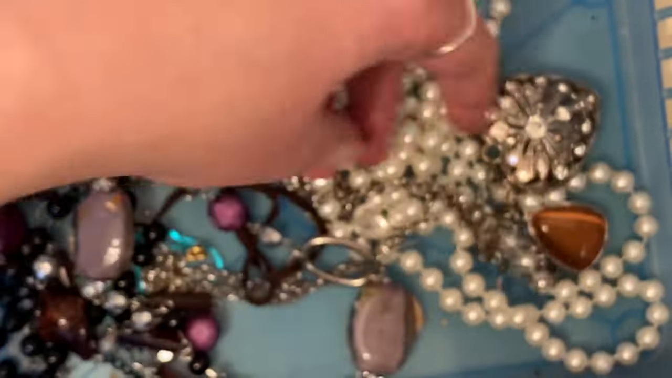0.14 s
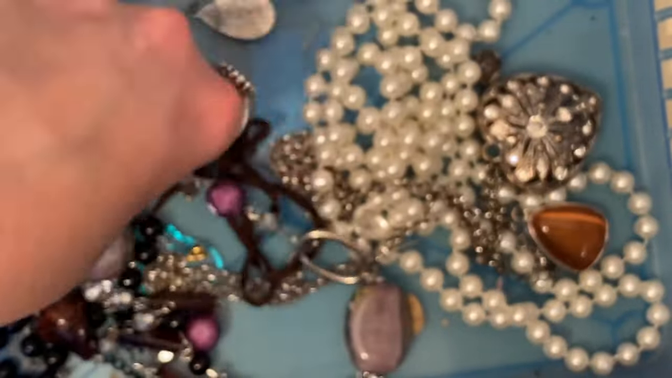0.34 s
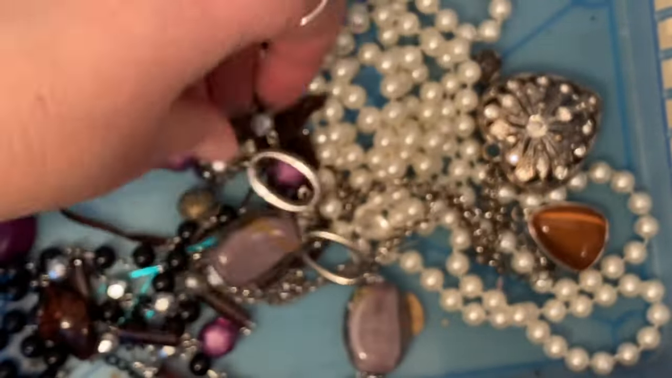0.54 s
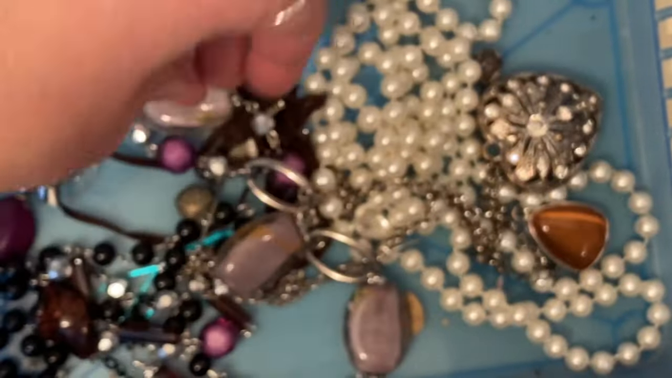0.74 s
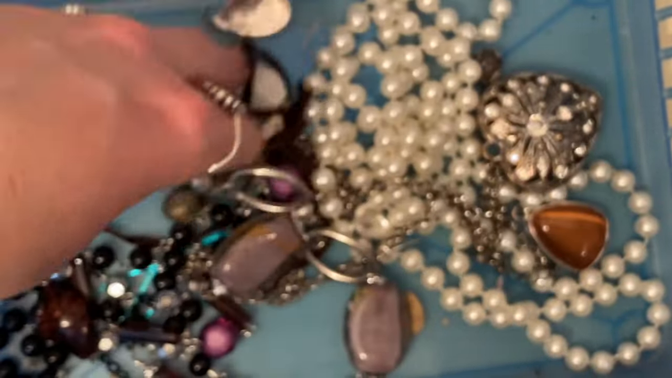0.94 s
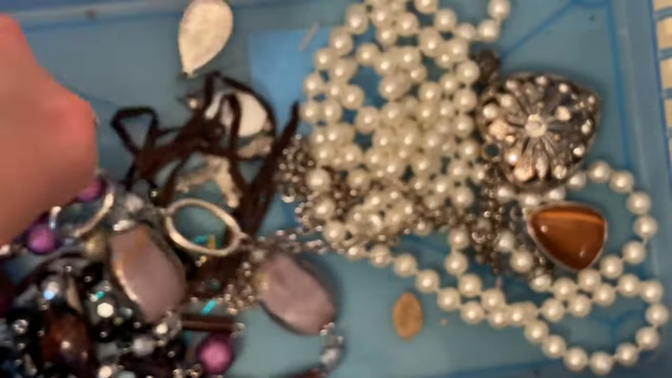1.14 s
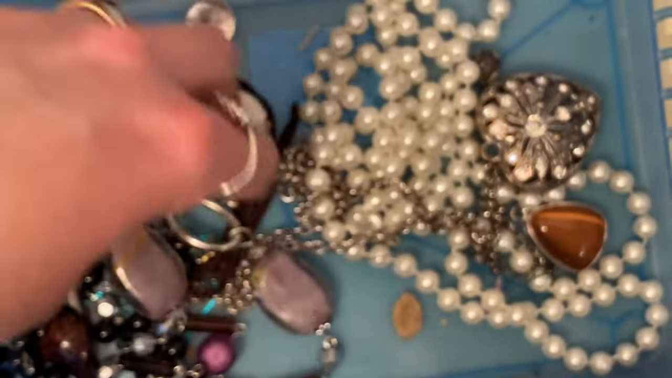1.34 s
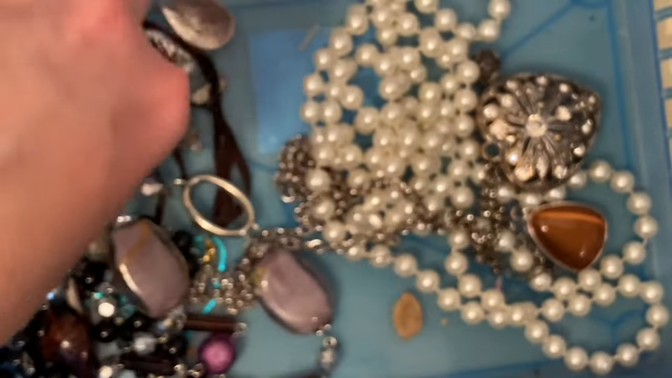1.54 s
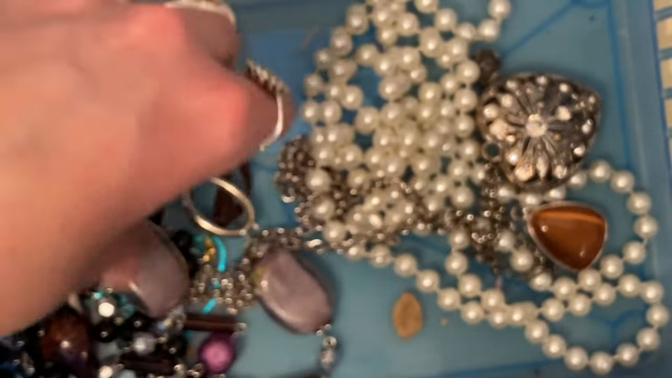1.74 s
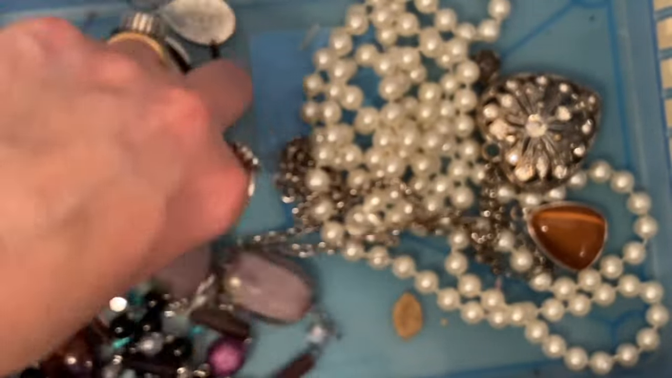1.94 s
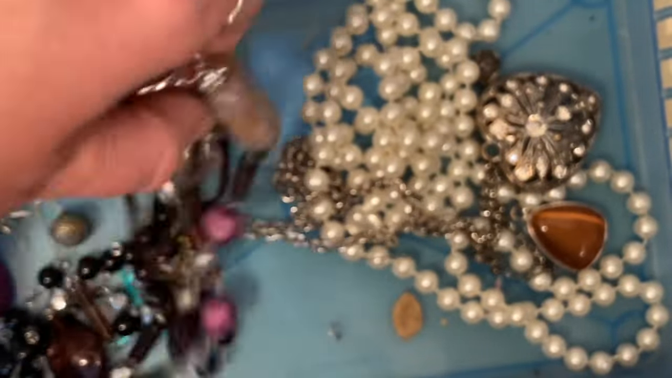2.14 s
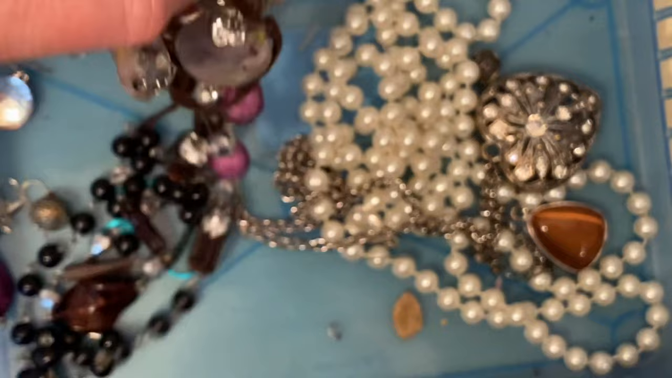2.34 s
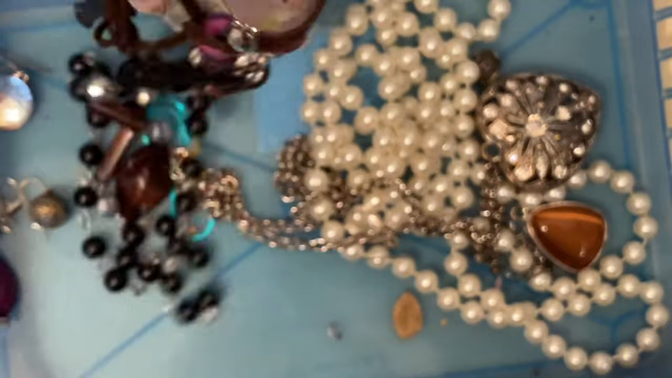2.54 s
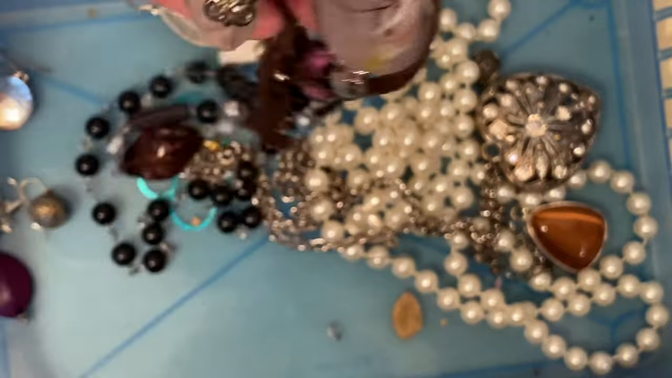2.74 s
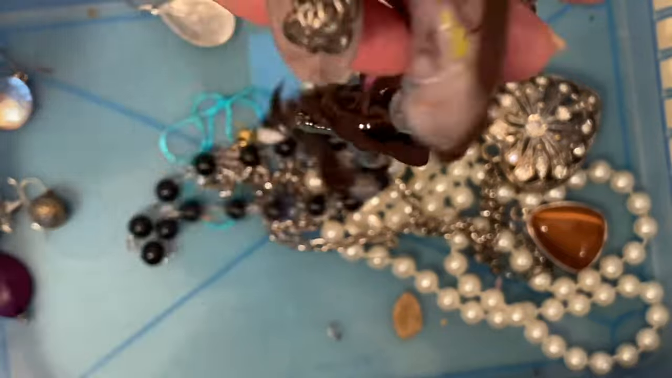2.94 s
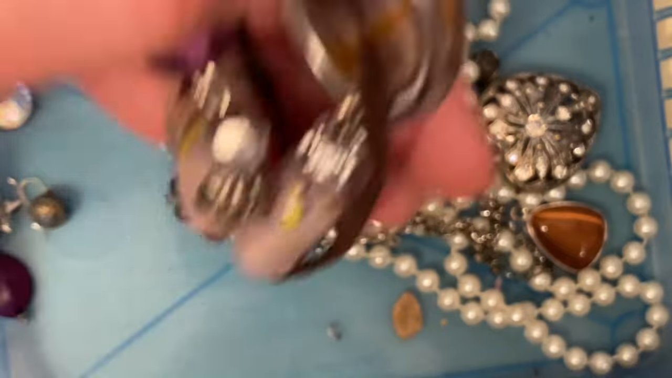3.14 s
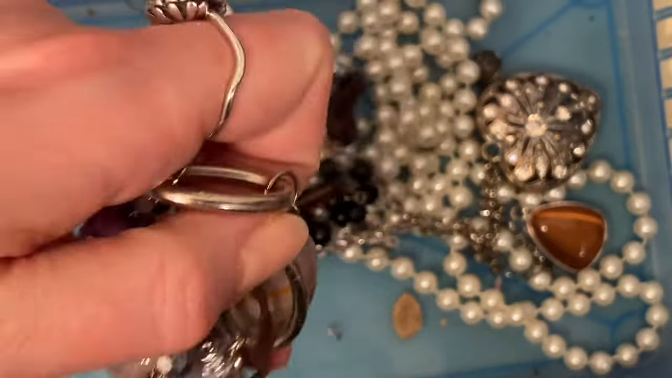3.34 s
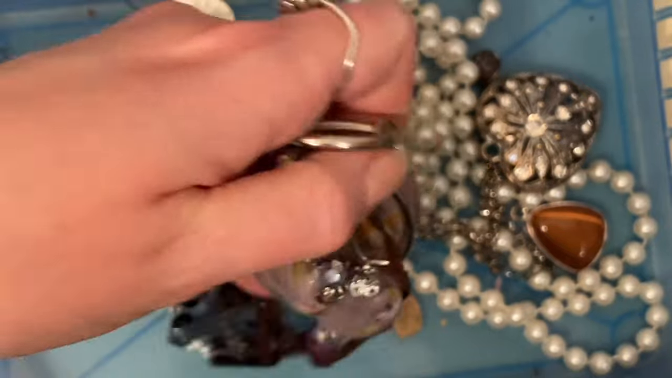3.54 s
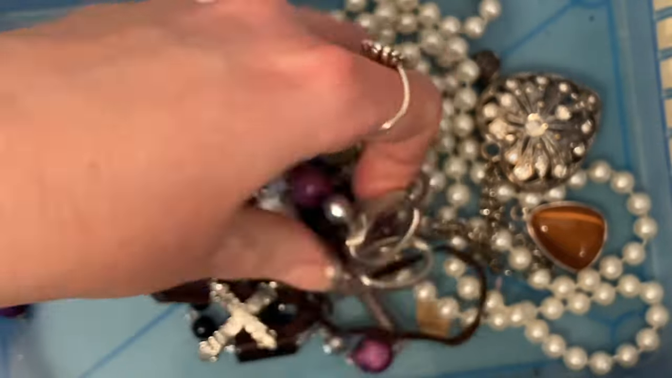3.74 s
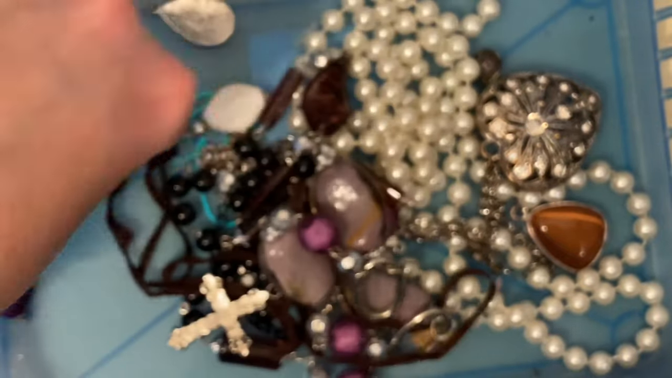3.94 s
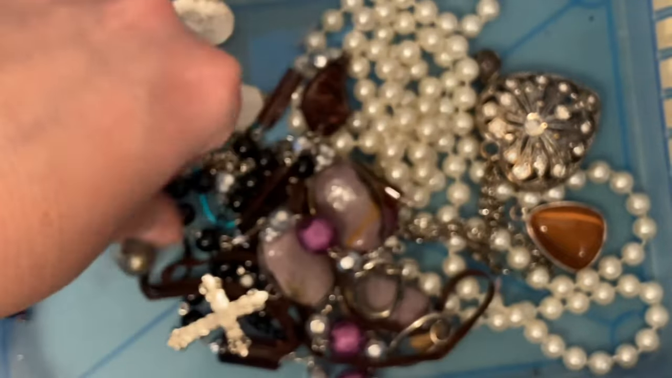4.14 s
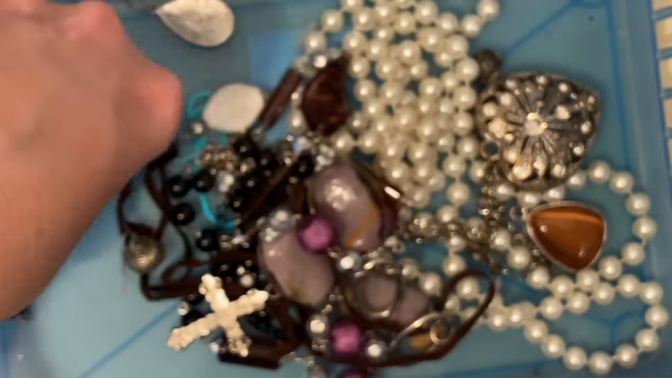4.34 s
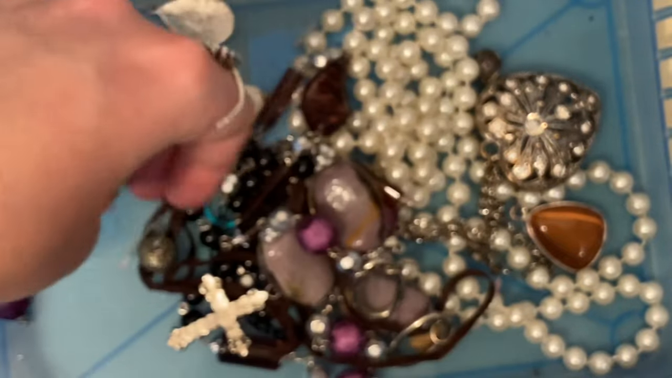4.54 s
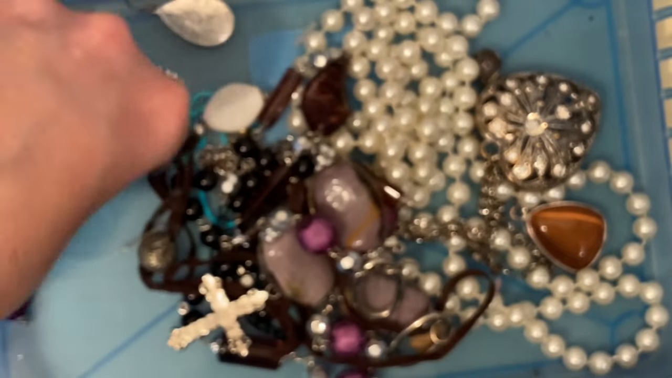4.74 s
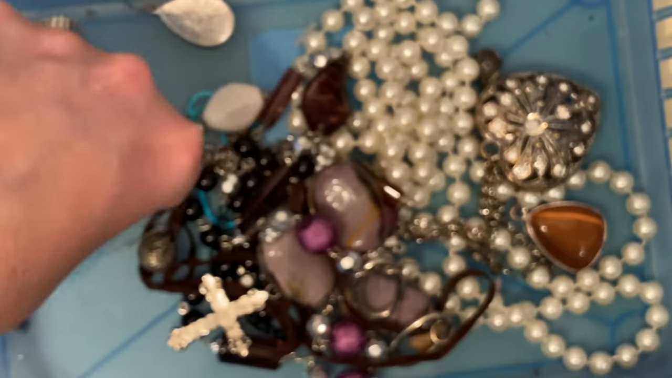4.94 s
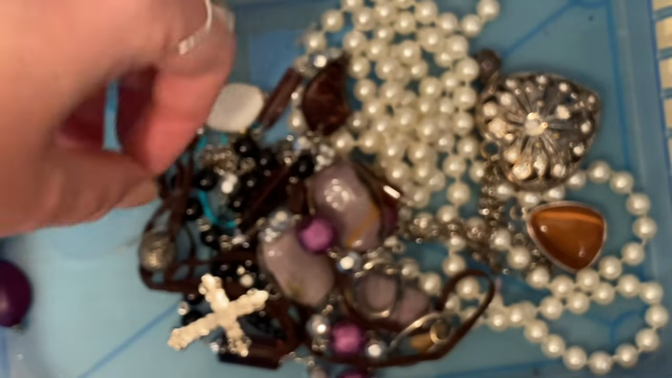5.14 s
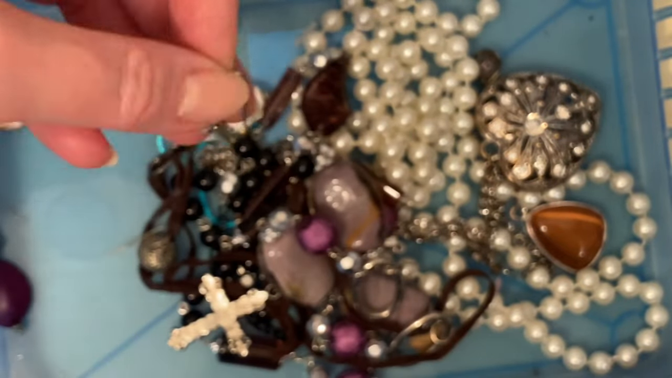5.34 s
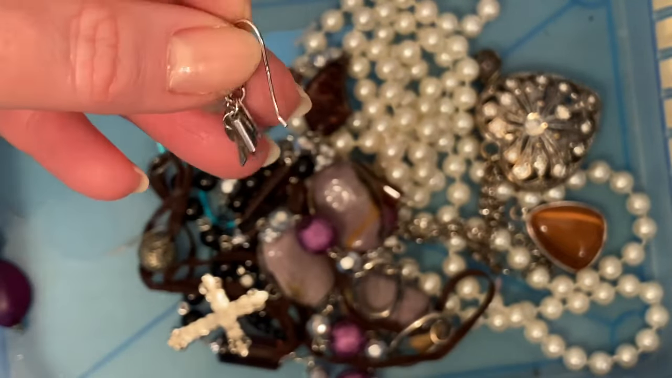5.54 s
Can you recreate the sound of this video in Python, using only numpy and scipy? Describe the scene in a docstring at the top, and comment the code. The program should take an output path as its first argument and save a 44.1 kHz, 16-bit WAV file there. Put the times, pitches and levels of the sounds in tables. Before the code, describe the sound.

Very close stereo pickup in a small quiet room: a loud clatter of beads and chain opens abruptly, then uneven strokes of clacking, trickling and dull plastic thuds follow with tiny gaps. A dense rattle peaks as a heavy handful is set down after the middle, then only sparse faint ticks remain over low hum and slight hiss.

```python
"""In a small quiet room a hand rummages through beads, pearls and metal chains in a plastic tub, heard close by
in stereo. Hard beads clack as brief modes with a rasp and a bright tick; chains trickle in dense ticks
over coloured noise. Heavy pieces and fingers thud the tub floor, exciting its resonances, and small metal
parts ping on one decaying sine. Noise tails make the room's answer; under it all lie a low hum and a faint
hiss whose level rises and dips together."""
import sys
import numpy as np
from scipy import signal
from scipy.fft import rfft, irfft, next_fast_len
from scipy.io import wavfile

SR = 44100
rng = np.random.default_rng(int(sys.argv[2]) if len(sys.argv) > 2 else 0)


def persist_wave(psi):
    """Save psi, clipped to +-1, as 16-bit WAV."""
    counts = np.round(np.clip(psi, -1, 1) * 32767).astype(np.int16)
    wavfile.write(sys.argv[1], SR, np.atleast_2d(counts).T)


N = 246783

# Colour of beads rasping and sliding. Each row: frequency in Hz, relative density in dB per Hz.
BEAD_SPECTRUM = [(300, -28.5), (700, -14), (1200, -9.5), (1900, -5), (2500, -3.5), (3400, -5), (4800, -9.5),
                 (7000, -18), (12000, -31.5)]
# Colour of bright ticks and chain links. Each row: frequency in Hz, relative density in dB per Hz.
GLITTER_SPECTRUM = [(3000, -31.5), (5500, 2), (8000, 4.5), (11000, 1), (14000, 3.5), (16000, -12.5)]


def amp(db):
    """Gain of a level in dB."""
    return 10 ** (np.asarray(db) / 20)


def unit(x):
    """x at rms 1."""
    return x / np.sqrt(np.mean(x ** 2) + 1e-20)


def along(points, hz):
    """Read a curve of (Hz, value) points on a log frequency axis."""
    f, v = np.transpose(points)
    return np.interp(np.log(hz + 1), np.log(f + 1), v)


def curves(rows):
    """One value per sample for each column after the time in seconds."""
    s, *cols = np.transpose(rows)
    return [np.interp(np.arange(N) / SR, s, c) for c in cols]


def filtered(x, response):
    """x shaped by a complex response of frequency."""
    m = next_fast_len(N + SR // 2)
    spectrum = rfft(x, m) * response(np.fft.rfftfreq(m, 1 / SR))
    return irfft(spectrum, m)[..., :N]


def placed(times, rows):
    """Sum of short sounds, one row each, started at their times in seconds."""
    starts = np.round(np.asarray(times) * SR).astype(int)
    at = starts[:, None] + np.arange(rows.shape[1])
    return np.bincount(at.ravel(), rows.ravel(), N + SR)[:N]


def fade(t60, rise, size):
    """Envelopes with a soft start and an exponential end; t60 and rise in seconds, size in samples."""
    t = np.arange(size) / SR
    return amp(-60 * t / t60) * (1 - np.exp(-t / rise))


def noise(spectrum):
    """Steady coloured noise of rms 1."""
    return unit(filtered(rng.standard_normal(N), lambda hz: amp(along(spectrum, hz))))


def rings(hz, t60, rise, spread, size):
    """Each contact starts three brief modes together: its pitch, one mode above and one just below."""
    t = np.arange(size) / SR
    draw = rng.standard_normal((len(hz), 6))
    pitch = hz[:, None] * np.exp(spread * np.abs(draw[:, :3]) * [0, 1.3, -.5])
    strength = amp(3.4 * draw[:, 3:] + [0, -5, -6])
    waves = strength[..., None] * np.sin(2 * np.pi * pitch[..., None] * t)
    return waves.sum(1) * fade(t60, rise, size)


def hum():
    """A low hum and a faint hiss, both noise, whose level rises and dips together."""
    # Colour of the hum. Each row: frequency in Hz, relative density in dB per Hz.
    hum_spectrum = [(30, -36), (41, 9.5), (48, 1.5), (55, -10), (95, -13.5), (150, -23), (220, -48.5)]
    # Colour of the hiss. Each row: frequency in Hz, relative density in dB per Hz.
    hiss_spectrum = [(100, -6), (300, -5), (600, -12), (1000, -18.5), (3000, -41), (8000, -44),
                     (15000, -43.5)]
    # Common level of the two. Each row: time in seconds, level of the hum in dB.
    hum_level = [(0.0, -53), (0.3, -55.5), (0.5, -51.5), (1.51, -54), (1.67, -56.5), (1.91, -59.5),
                 (2.04, -56.5), (2.33, -58.5), (2.79, -51), (3.28, -52.5), (4.08, -47.5), (4.4, -42.5),
                 (4.58, -51.5), (4.86, -60), (5.03, -49), (5.59, -48.5)]
    level_db = curves(hum_level)[0]
    return amp(level_db) * (noise(hum_spectrum) + amp(-19.5) * noise(hiss_spectrum))


def tail(t60, size):
    """A noise tail of energy 1, each frequency dying away with its own t60."""
    hz, t, z = signal.stft(rng.standard_normal(size), SR, nperseg=128)
    decay = amp(-60 * t / t60(hz)[:, None])
    x = signal.istft(z * decay, SR, nperseg=128)[1]
    return x / np.linalg.norm(x)


def room(x):
    """The walls answer after a few milliseconds; a new noise tail every quarter second keeps it diffuse."""
    # How long the walls ring on. Each row: frequency in Hz, t60 in seconds.
    walls = [(150, 0.33), (1000, 0.12), (5000, 0.087), (14000, 0.02)]
    step, delay = SR // 4, 200  # samples
    parts = np.pad(x, (delay, step - (N + delay) % step)).reshape(-1, step)
    tails = [tail(lambda hz: along(walls, hz), size=SR // 3) for _ in parts]
    echoes = np.array([signal.fftconvolve(p, answer) for p, answer in zip(parts, tails)])
    return placed(np.arange(len(parts)) * step / SR, echoes)


def tub_noise():
    """Noise in the resonances of the tub floor, at rms 1."""
    # Resonances of the plastic. Each row: centre in Hz, width in Hz, relative strength in dB.
    tub = [(107, 22, -1), (212.8, 11, 2.5), (358, 110, -3), (561.6, 230, -11), (970, 620, -19.5)]

    def modes(f):
        total = 0
        for k, (centre, width, db) in enumerate(tub):
            resonance = 1j * f * width / (centre * centre - f * f + 1j * f * width)
            total = total + (-1) ** k * amp(db) * resonance  # neighbours in opposite phase
        return total

    return unit(filtered(rng.standard_normal(N), modes))


def stirring():
    """Drive of trickle, glitter and rumble in dB: each stroke of the hand swells, holds and settles."""
    # Strokes through the heap. Each row: start in seconds, swell in seconds, hold in seconds,
    # trickle drive in dB, chain glitter over it in dB, tub rumble over it in dB.
    strokes = [(0, 0.047, 0.0069, -12.5, -0.5, -14.5), (0.154, 0.024, 0.011, -38.5, 10, -22),
               (0.29, 0.015, .08, -23.5, -8.5, -8), (0.355, 0.13, .01, -18.5, -5.5, -11),
               (.52, 0.02, 0.0045, -28.5, -5, -2), (0.604, 0.053, 0.0045, -44.5, -11, 13),
               (0.687, .06, 0.11, -59.5, -13.5, 4), (0.846, .022, 0.0043, -29, -22, -8.5),
               (0.928, 0.12, .01, -14, -1.5, -10), (1.16, 0.028, .005, -25, -13.5, -0.5),
               (1.29, .035, .02, -47.5, 7, -8.5), (1.406, 0.031, 0.058, -27.5, -22.5, 1),
               (1.475, 0.05, 0.027, -32, -8.5, -10.5), (1.817, 0.026, 0.18, -26, -2, -9.5),
               (1.9, 0.22, 0.19, -25, -5, -12.5), (2.196, 0.21, 0.12, -28.5, -13.5, -13.5),
               (2.49, .09, 0.05, -24.5, -15, -11.5), (2.577, 0.13, 0.12, -31.5, -7.5, -17.5),
               (2.699, .21, .02, -32, -4.5, -12.5), (2.918, .09, 0.056, -33.5, -6, -11),
               (3.129, 0.047, 0.0037, -27, -5, -10.5), (3.229, .145, 0.014, -19.5, -5, -13.5),
               (3.442, .11, .04, -23, -1.5, -5.5), (3.648, 0.083, 0.056, -17, 2, -5),
               (3.719, 0.15, 0.033, -33.5, -6.5, -11.5), (3.868, .09, .01, -40.5, -6.5, 6.5),
               (4.033, 0.031, 0.0055, -33.5, -18.5, -3), (4.317, 0.059, .03, -41.5, 5, 0.5),
               (4.414, 0.076, 0.019, -54.5, 0.5, -19), (4.686, 0.05, 0.051, -55, -3, 14.5),
               (4.793, 0.045, .05, -46, -2, 0), (4.914, 0.034, 0.043, -52, -8, -18),
               (4.996, 0.058, 0.017, -54, 6, -8)]
    # Trickle, glitter and rumble die away after a stroke, each at its rate in dB per second.
    settle_rates = [228.5, 259, 159.5]
    # Faint floor under trickle, glitter and rumble that stays in the pauses, each in dB.
    floor_levels = [-84, -88, -70]
    swell_db, start_db_per_s = 25, 2500  # growth during the swell; how fast a stroke sets in from silence
    t = np.arange(0, N, 64) / SR
    power = amp(floor_levels)[:, None] ** 2
    for start, swell, hold, db, glitter_db, rumble_db in strokes:
        full = start + swell  # time of full strength
        before = swell_db * np.maximum(full - t, 0) / max(swell, .01)
        before = before + start_db_per_s * np.maximum(start - t, 0)
        after = np.outer(settle_rates, np.maximum(t - full - hold, 0))
        peak_db = db + np.array([[0], [glitter_db], [rumble_db]])
        power = power + amp(peak_db - before - after) ** 2
    return [np.interp(np.arange(N) / SR, t, 10 * np.log10(p)) for p in power]


def patter(scatter_db, count):
    """Random times and sizes of many small contacts, few of them strong."""
    draw = rng.random((count, 2))
    size_db = np.minimum(-scatter_db * np.log(1 - draw[:, 1:]), 15)
    return draw[:, 0] * N / SR, amp(size_db)


def heap(trickle_db, glitter_db, rumble_db):
    """The stirred heap: small beads knock and slide, chain links glitter, the tub rumbles under them."""
    # in pauses the contacts stop and only a faint even noise stays
    moving = np.clip((trickle_db + 62.5) / 12, 0, 1)
    s, size = patter(3.73, count=4200)
    hz = 2000 * np.exp(.22 * rng.standard_normal(len(s)))
    knocks = unit(placed(s, size * rings(hz, .009, .0003, .3, size=512)))
    trickle = amp(trickle_db - 0.3) * (0.6 * moving * knocks + 0.58 * noise(BEAD_SPECTRUM))
    flicker = unit(placed(s, size * fade(0.033, .0004, size=512)))
    glitter = amp(glitter_db - 11.5) * (0.75 + 1.7 * moving * flicker) * noise(GLITTER_SPECTRUM)
    rumble = amp(rumble_db - 3.5) * tub_noise()
    return trickle + glitter + rumble


def pings():
    """Small metal parts ring on one high mode."""
    # Each row: start in seconds, level in dB, pitch in Hz, t60 in seconds.
    ping_rows = [(.059, 1, 7700, .04), (.06, -16.5, 12780, 0.14), (1.483, -31, 13680, .2),
                 (1.526, -19, 13680, 0.19), (1.69, -62, 13680, .24), (1.49, -23, 9800, 0.041),
                 (1.525, -26, 9800, 0.12)]
    s, db, hz, t60 = np.transpose(ping_rows)[..., None]
    tone = np.sin(2 * np.pi * hz * np.arange(SR // 4) / SR)
    return placed(s[:, 0], amp(db) * tone * fade(t60, 0.00033, size=SR // 4))


def thuds():
    """Heavy pieces and fingertips slap the tub floor, push it, make it boom and leave it shaking."""
    # Each row: start in seconds, strength of the blow in dB, pitch of the push in Hz, boom over the blow in dB.
    blows = [(0.01, -14, 335.4, -11.5), (0.049, -1, 215, -6), (0.217, -48, 296.4, 6.5),
             (0.325, -29, 210.5, -11), (0.358, -21.5, 488, -12.5), (0.394, -26, 226.6, -16),
             (0.466, -24.5, 425, -22.5), (0.536, -19, 424.3, -23), (0.571, -21, 308, -17.5),
             (0.595, -26, 423, -7), (0.665, -12.5, 411, -23.5), (0.686, -24, 300, -8.5),
             (0.874, -15, 395, -15.5), (0.99, -29, 234, -14), (1.046, -20, 396.5, -22.5),
             (1.077, -21, 395, -17), (1.11, -25.5, 272.5, -5.5), (1.193, -16, 414, -26.5),
             (1.313, -33.5, 411, -6), (1.421, -12, 391, -17.5), (1.449, -19, 359.7, -4),
             (1.483, -24.5, 296.8, 2), (1.52, -23, 562, -9.5), (1.83, -17, 417.5, -25.5),
             (1.856, -26, 235.4, -13), (1.919, -21.5, 209.8, -20.5), (1.952, -22, 442, -10),
             (2.097, -26.5, 343.4, -15.5), (2.293, -30, 305, -6.5), (2.374, -34, 377, -4),
             (2.488, -30.5, 440, -20.5), (2.558, -24, 381, -26), (2.732, -26, 381.6, -33),
             (2.85, -39, 375, -16), (3.177, -24.5, 349, -15.5), (3.315, -22, 407.6, -32),
             (3.372, -21, 680, -21.5), (3.446, -29.5, 322.6, -9), (3.523, -23, 571, -19),
             (3.544, -17, 393, -8), (3.629, -24, 493.5, -15), (3.698, -16, 369, -23.5),
             (3.741, -11.5, 437, -25.5), (3.781, -21, 378, -10), (3.86, -28, 506, -12),
             (3.941, -28.5, 398, -13.5), (3.976, -19, 415, -7.5), (4.043, -21, 385, -13),
             (4.341, -23.5, 396, -9), (4.383, -22.5, 312.4, -13.5), (4.697, -33, 398.6, -10.5),
             (4.746, -22, 393, -10.5), (4.797, -34.5, 216.6, -3.5), (4.836, -27.5, 225.8, -15.5),
             (4.877, -29.5, 219.6, -8)]
    # First contact with the plastic. Each row: frequency in Hz, relative density in dB per Hz.
    slap_spectrum = [(150, -16.5), (400, 1.5), (900, 14.5), (1500, -7.5), (3000, -33.5)]
    boom_hz = 137  # pitch of the low boom of the tub floor
    s, db, hz, boom_db = np.transpose(blows)
    gain = amp(db)[:, None]
    slap_gain = gain ** 1.39 * amp(6.5)  # harder blows are brighter
    slap = placed(s, slap_gain * fade(0.028, 0.0044, size=4096)) * noise(slap_spectrum)
    push = placed(s, gain * amp(-3.5) * rings(hz, 0.074, 0.00067, 0.28, size=4096))
    boom_rings = rings(boom_hz + 0 * s, 0.11, .003, 0.05, size=8192)
    boom = placed(s, gain * amp(boom_db)[:, None] * boom_rings)
    shaking = placed(s, gain * amp(-3.5) * fade(0.024, 0.0028, size=4096)) * tub_noise()
    return slap + push + boom + shaking


def loose(trickle_db, count):
    """Lesser clacks at random moments, following the strength of the stirring then."""
    over_trickle_db, typical_hz, typical_treble_db = 1.5, 2190, -14.5
    s = rng.random(count) * (N - 1) / SR
    draw = np.clip(rng.standard_normal((count, 3)), -2, 2)
    db = trickle_db[(s * SR).astype(int)] + over_trickle_db + 3 * draw[:, 0]
    hz = typical_hz * np.exp(0.29 * draw[:, 1])
    treble_db = typical_treble_db + 6 * draw[:, 2]
    return np.transpose([s, db, hz, treble_db])


def clacks(trickle_db):
    """Bead on bead and bead on plastic: a short pitched knock, a rasp and a bright tick."""
    # Beads and stones. Each row: start in seconds, strength in dB, pitch in Hz,
    # treble over the strength in dB, ahead of a common lift.
    main_clacks = [(0.012, -2, 3370, -20), (0.0155, 0.5, 1700, -14), (0.0508, 9, 1600, -19.5),
                   (0.056, -3.5, 1700, -4.5), (0.0663, 4, 1853, -8.5), (0.0815, -9.5, 1817, -3),
                   (0.1218, -17, 3374, -11), (0.1271, -12, 1682, -2), (0.1416, -8.5, 2787, -17.5),
                   (0.1834, -27, 1643, -3.5), (0.192, -17.5, 2330, -8.5), (0.2034, -19, 2340, -9.5),
                   (0.2994, -19, 2430, -28.5), (0.3071, -12.5, 2298, -23), (0.3145, -3, 2602, -26),
                   (0.3382, -4.5, 3144, -16), (0.3501, -7, 1947, -17), (0.3637, -12, 2866, -14.5),
                   (0.388, -3, 3314, -24), (0.3994, -10, 2307, -12.5), (0.422, -9, 2910, -21.5),
                   (0.4335, -14.5, 1514, -7), (0.4588, -5.5, 2540, -22.5), (0.4659, -2, 2638, -34.5),
                   (0.4854, -19.5, 2240, -21), (0.5027, -15.5, 2390, -21.5), (0.5357, -3, 3475, -10.5),
                   (0.5504, -10, 1720, -16), (0.577, -11.5, 2017, -24), (0.638, -29, 1803, -25),
                   (0.6614, -15, 1985, -38), (0.8575, -15.5, 1457, -16.5), (0.8616, -12, 2376, -23.5),
                   (0.8774, -7.5, 2030, -19), (0.9273, -33, 2730, -22.5), (0.9376, -25, 2003, -28),
                   (0.948, -17.5, 2550, -29.5), (0.9598, -18.5, 1484, -32), (0.9817, -22, 1462, -22.5),
                   (1.0036, -11.5, 2285, -26), (1.0224, -4, 2318, -17.5), (1.0297, -7.5, 2427, -5.5),
                   (1.0434, -9, 2287, -18.5), (1.0511, -1, 2786, -11.5), (1.0654, -19.5, 2010, -5.5),
                   (1.0834, -2, 1978, -10), (1.1042, -7, 3155, -20.5), (1.1444, -22.5, 1700, -3.5),
                   (1.1952, 2.5, 2190, -20), (1.2085, -3, 1897, -21), (1.2146, -5, 3430, -17.5),
                   (1.235, -11.5, 1588, -24.5), (1.2954, -31.5, 1998, -17), (1.3144, -6, 2870, -9),
                   (1.3319, -26, 3290, -21), (1.4232, 5.5, 2270, -17.5), (1.4264, -3.5, 2140, -22),
                   (1.4471, -10.5, 2130, -21), (1.4552, -6.5, 1983, -27), (1.4777, -14.5, 2020, -9),
                   (1.487, -0.5, 1900, -9.5), (1.5189, -12.5, 1612, -2), (1.5252, -2, 2110, -9.5),
                   (1.5508, -10.5, 2124, -15), (1.5699, -10, 2370, -10), (1.5938, -27.5, 2455, -6.5),
                   (1.6165, -30.5, 3285, -3.5), (1.6397, -33.5, 1460, -3), (1.683, -48, 1610, -6),
                   (1.8209, -12, 1670, -25), (1.8412, -7, 1686, -28.5), (1.8566, 1, 2753, -22.5),
                   (1.8611, -4, 1967, -13.5), (1.9193, -4.5, 2046, -30), (1.942, -7, 2197, -28.5),
                   (1.951, -2.5, 2080, -29), (1.9824, -10.5, 2318, -23), (2.0004, -22, 2108, -14),
                   (2.0111, -7, 2340, -22), (2.0288, -9, 2270, -19), (2.0717, -12, 1900, -18),
                   (2.0971, -9, 2216, -15.5), (2.1213, -8, 1635, -20.5), (2.147, -10, 2497, -15),
                   (2.168, -11.5, 1555, -8), (2.1918, -13, 1600, -23.5), (2.2092, -15.5, 2023, -27),
                   (2.2227, -12, 2150, -15.5), (2.2684, -23, 2323, -25.5), (2.2888, -18, 2390, -21.5),
                   (2.3007, -17, 1470, -22), (2.336, -17.5, 3045, -13.5), (2.3466, -0.5, 2823, -21),
                   (2.3701, -8, 1848, -24.5), (2.3802, -9, 2106, -16.5), (2.4312, -21, 2003, -21),
                   (2.4727, -15.5, 1918, -17), (2.4848, -9, 1897, -16), (2.4965, -15.5, 2750, -19.5),
                   (2.522, -19, 1858, -24), (2.5407, -12.5, 1530, -21), (2.5634, -5, 2420, -11),
                   (2.5689, -3.5, 1992, -18), (2.5825, -1.5, 2636, -17.5), (2.5914, -3.5, 1953, -30.5),
                   (2.609, -18, 3276, -27), (2.7028, -13, 2335, -24.5), (2.7164, -16.5, 2236, -20.5),
                   (2.732, -0.5, 2335, -15), (2.7849, -23, 2120, -24), (2.813, -24, 1874, -27.5),
                   (2.8399, -21, 1614, -18), (2.889, -14.5, 2010, -15.5), (2.9087, -19.5, 2300, -21),
                   (2.9205, -16, 2690, -11), (2.9786, -14.5, 1942, -17.5), (2.9975, -8.5, 2036, -7.5),
                   (3.0165, -10, 1934, -22), (3.0435, -19, 2030, -14.5), (3.0795, -21, 1905, -25.5),
                   (3.1209, -21.5, 2048, -18), (3.148, -16.5, 4520, -5), (3.1748, -12.5, 1950, -9.5),
                   (3.1996, -9.5, 1970, -20), (3.2299, -14.5, 1972, -14), (3.242, -14, 3550, -11.5),
                   (3.2853, -14.5, 2013, -30.5), (3.2963, -11, 2173, -15.5), (3.3044, -5.5, 1844, -27.5),
                   (3.3116, -10.5, 1990, -25), (3.3333, -5, 1787, -29), (3.338, -8.5, 2010, -28),
                   (3.3485, -5, 1750, -27), (3.3576, -5.5, 2140, -31.5), (3.3621, -5.5, 1920, -31),
                   (3.3743, 3.5, 2110, -24), (3.3886, -1, 1920, -20), (3.4094, -5, 2153, -26),
                   (3.4361, -13.5, 2090, -30), (3.4426, -15.5, 2168, -29.5), (3.4514, -7.5, 2096, -31),
                   (3.4615, -13, 2040, -31), (3.4705, -7.5, 1937, -25), (3.51, -8, 2180, -18),
                   (3.5194, 3, 1994, -18), (3.5283, -5.5, 1810, -18), (3.5431, 3, 1990, -22),
                   (3.5564, -3, 1720, -10.5), (3.5762, -11, 1970, -20), (3.5881, 1.5, 1730, -13.5),
                   (3.6231, -12, 2113, -24.5), (3.6312, 3.5, 1860, -26), (3.638, -3.5, 1645, -30),
                   (3.676, -5, 1600, -18), (3.6876, -4, 2098, -18), (3.6983, 4, 1850, -17.5),
                   (3.7036, -2.5, 2024, -8.5), (3.7319, 7, 1758, -15.5), (3.7394, -0.5, 1940, -11.5),
                   (3.7502, -4, 1835, -9), (3.7584, 1.5, 2057, -22), (3.785, -10.5, 2394, -21.5),
                   (3.7958, -11, 2058, -16.5), (3.8304, -10, 3190, -26), (3.8381, -13.5, 1927, -25.5),
                   (3.8611, -14, 3160, -20.5), (3.8677, -8.5, 2900, -25.5), (3.8838, -3, 1740, -32),
                   (3.9413, -13, 1598, -32.5), (3.9684, -18.5, 1492, -25), (4.0449, -7.5, 2030, -24.5),
                   (4.071, -23, 2194, -32), (4.0867, -22, 2277, -29), (4.104, -21, 1692, -31.5),
                   (4.1177, -31, 2770, -33), (4.157, -31, 1650, -25), (4.341, -23, 4260, -7),
                   (4.349, -27, 3970, -15.5), (4.378, -18, 2860, -26.5), (4.404, -24, 3310, -28),
                   (4.4232, -25.5, 2880, -15), (4.4446, -24.5, 2800, -12), (4.4591, -24, 2850, -29),
                   (4.4746, -30, 3340, -33), (4.5096, -34.5, 3250, -21), (4.5261, -30.5, 3970, -10.5),
                   (4.5362, -26.5, 2260, -42), (4.6927, -35.5, 2980, -15), (4.7286, -23, 2280, -25.5),
                   (4.8324, -23.5, 2796, -35), (4.8494, -32, 2730, -9), (4.8688, -24.5, 3280, -21.5),
                   (4.8858, -27, 3800, -11), (4.8984, -32, 2170, -5), (4.9093, -44.5, 2860, 1),
                   (4.9407, -32, 4060, -7.5), (4.9487, -33, 3560, -12.5), (4.995, -45, 2790, -18),
                   (5.036, -22, 2795, -19), (5.0584, -39.5, 3210, -3), (5.0697, -28, 2786, -23),
                   (5.0917, -34.5, 2870, -24)]
    s, db, hz, treble_db = np.vstack([main_clacks, loose(trickle_db, count=600)]).T
    gain = amp(db)[:, None]
    contact = rings(hz, .011, .0004, .3, size=1024)
    knock = placed(s, gain * amp(-1.8) * contact)
    rasp = placed(s, gain * amp(-8.5) * fade(0.027, 0.00028, size=1024)) * noise(BEAD_SPECTRUM)
    spike = fade(0.0026, 0.00016, size=1024)
    rebound = amp(-5.5) * fade(0.018, 0.0011, size=1024)
    tick_gain = gain * amp(treble_db + 12)[:, None]  # the common lift is 12 dB
    tick = placed(s, tick_gain * (spike + rebound)) * noise(GLITTER_SPECTRUM)
    return knock + rasp + tick


def scattered(x):
    """x with random phases over a few milliseconds: similar in colour and level, unrelated in waveform."""
    z = signal.stft(x, nperseg=128)[2]
    turned = z * np.exp(2j * np.pi * rng.random(z.shape))
    y = signal.istft(turned, nperseg=128)[1][:N]
    return y * np.std(x) / np.std(y)


def scene():
    """All sources as one near sound, with a scattered copy for what differs between the channels."""
    levels = stirring()
    near = clacks(levels[0]) + thuds() + heap(*levels)
    near = near + amp(-15.0) * room(near) + pings() + hum()
    return np.array([near, scattered(near)])


def record(dry):
    """Two channels whose phase and level differ by frequency, softly clipped and cut off at a band limit."""
    # Phase between the channels. Each row: frequency in Hz, lead of the left in radians.
    lead = [(280, 0), (500, -.5), (780, -.9), (1150, -.5), (1800, 0), (2600, .75), (3700, .45), (4130, .55),
            (4950, 2.25), (5500, 1.5), (6300, 1.7), (8500, 2.95), (10000, 3.15), (11500, 3.5),
            (15300, 5.05)]
    # Level between the channels. Each row: frequency in Hz, left minus right in dB.
    tilt = [(210, 0), (330, 3.5), (500, 6), (770, 3), (1170, .4), (1600, 0)]
    # What the channels do not share. Each row: frequency in Hz, share of unrelated sound from 0 to 1.
    apart = [(250, 0), (450, .06), (720, .25), (950, .05), (1200, .22), (1700, .01), (3300, .13),
             (5500, .3), (8000, .1), (10000, .02), (12000, .15), (15000, .35)]
    top_hz = 16000  # band limit

    def blend(hz):
        turn = np.arccos(np.sqrt(1 - along(apart, hz))) / 2
        return np.array([np.cos(turn), np.sin(turn)])

    def channel_offsets(hz):
        half = amp(along(tilt, hz) / 2) * np.exp(.5j * along(lead, hz))
        return np.array([half, 1 / half])  # each channel takes half of the difference

    def band_limit(hz):
        return np.sin(np.pi / 2 * np.clip((top_hz - hz) / 250, 0, 1)) ** 2

    mid, side = filtered(dry, blend)
    pair = filtered(np.array([mid + side, mid - side]), channel_offsets)
    pair = pair / (1 + np.abs(pair / .98) ** 8) ** (1 / 8)  # soft clipping
    return filtered(pair, band_limit)


dry = scene()
out = record(dry)
persist_wave(out)
```